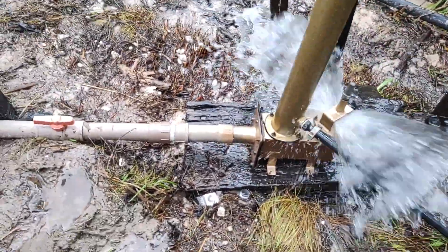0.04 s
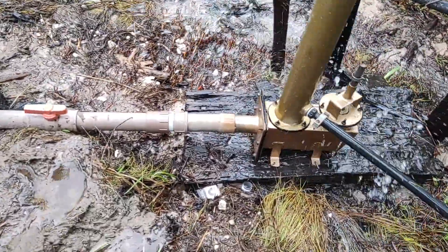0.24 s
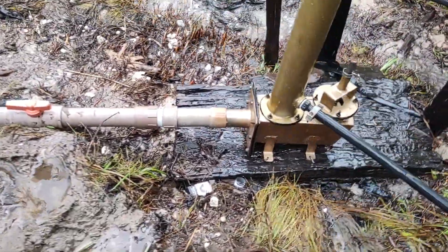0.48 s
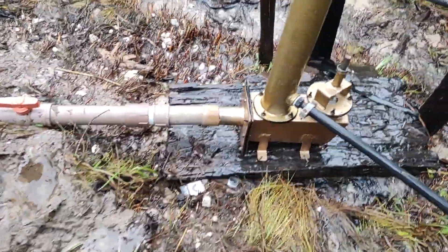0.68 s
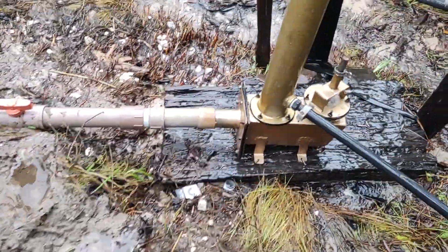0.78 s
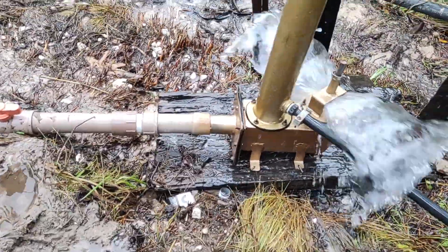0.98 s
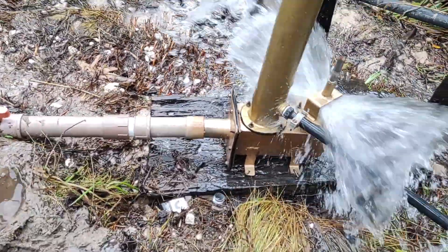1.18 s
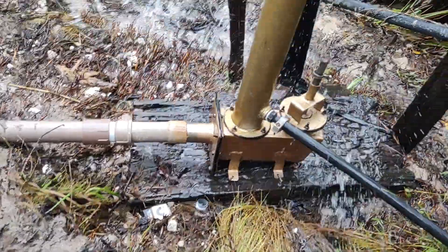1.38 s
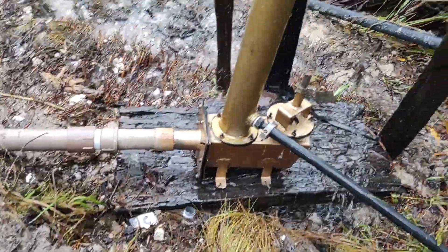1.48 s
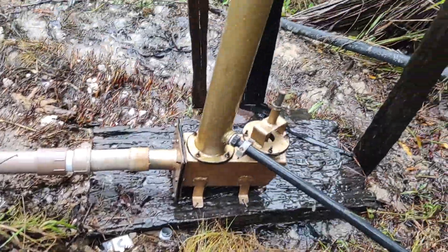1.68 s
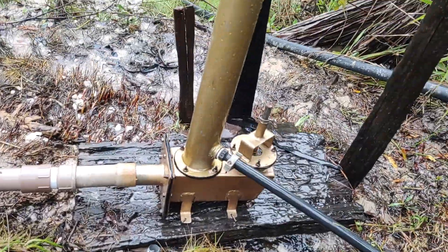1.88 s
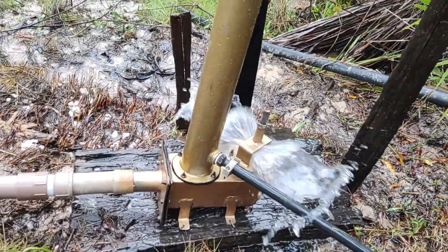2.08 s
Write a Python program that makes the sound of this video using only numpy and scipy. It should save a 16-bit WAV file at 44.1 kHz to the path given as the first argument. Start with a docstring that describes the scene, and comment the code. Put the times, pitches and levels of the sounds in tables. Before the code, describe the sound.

A water-driven pump beats twice, close up outdoors: the valve slams shut, thumps, drops open and hammers hard on its stop, then duller knocks follow in the pipe, amid spurting, pattering water on wet boards.

```python
"""Hydraulic ram pump, close by

Outdoors, close microphones: the pump beats about once a second. Its waste valve slams shut, the pressure wave
thumps back, the valve drops open and hammers two or three times on its stop, then knocks run along the drive pipe.
Each blow is a push, a coloured noise clatter and damped modes; the brass body rings on as fainter modes.
Sines make late rings after the blows; shaped noise and chirping grains make the spurting, splattering water."""
import sys
import numpy as np
from scipy import signal
from scipy.fft import rfft, irfft, next_fast_len
from scipy.io import wavfile
from scipy.ndimage import map_coordinates

SR = 44100
rng = np.random.default_rng(int(sys.argv[2]) if len(sys.argv) > 2 else 0)


def wav_out(sig):
    """Save sig, one row per channel (or a flat mono array), as 16-bit PCM at SR to the path in sys.argv[1]."""
    wavfile.write(sys.argv[1], SR, np.round(np.clip(np.atleast_2d(sig).T, -1, 1) * 32767).astype(np.int16))


N = 94815


def amp(db):
    """Decibels to amplitude."""
    return 10 ** (np.asarray(db) / 20)


def unit(x):
    """Scale to an RMS of one."""
    return x / np.sqrt(np.mean(x ** 2) + 1e-20)


def along(points, hz):
    """Interpolate (frequency [Hz], value) points on a log frequency axis."""
    f, v = np.transpose(points)
    return np.interp(np.log(hz + 1), np.log(f + 1), v)


def filtered(x, response):
    """Multiply the spectrum of x by a complex response of frequency."""
    size = next_fast_len(x.shape[-1] + 4096, True)
    spectrum = rfft(x, size) * response(np.fft.rfftfreq(size, 1 / SR))
    return irfft(spectrum, size)[..., :x.shape[-1]]


def coloured(x, points):
    """Pass x through a minimum-phase filter of unit energy with this spectrum."""
    size = 4096
    cepstrum = irfft(np.log(amp(along(points, np.fft.rfftfreq(size, 1 / SR)))))
    # folding the cepstrum forward makes the filter causal
    cepstrum[1:size // 2] *= 2
    cepstrum[size // 2 + 1:] = 0
    h = irfft(np.exp(rfft(cepstrum)))
    return signal.fftconvolve(x, h[None] / np.linalg.norm(h), axes=1)[:, :x.shape[1]]


# likeness of the two microphone channels: (frequency [Hz], correlation [-1 to 1])
CHANNEL_LIKENESS = [(100, 0.98), (300, 0.82), (600, 0.62), (1000, 0.48), (2000, 0.13), (4000, -0.12),
                    (12000, 0.03)]


def noise(size):
    """White stereo noise, alike in the bass and nearly unrelated in the treble."""
    def mid_side(hz):
        angle = np.arccos(np.clip(along(CHANNEL_LIKENESS, hz), -1, 1)) / 2
        return np.array([np.cos(angle), np.sin(angle)])

    mid, side = filtered(rng.standard_normal((2, size)), mid_side)
    return np.array([mid + side, mid - side])


def wobble(rate, size=N):
    """A smooth random curve with this many knots a second."""
    knots = rng.standard_normal(int(size * rate / SR) + 4)
    return map_coordinates(knots, [np.arange(size) * rate / SR])


def swell(t, rise, t60):
    """A rounded rise, then an exponential fall of 60 dB in t60 seconds."""
    attack = np.sin(np.pi / 2 * np.clip(t / max(rise, 1e-5), 0, 1)) ** 2
    return attack * np.exp(-np.log(1000) * np.maximum(t - rise, 0) / t60)


def ring(t, modes, rise, pitch=1):
    """Sum damped modes, each a little different in level from blow to blow."""
    total = 0
    for hz, db, t60 in modes:
        level = amp(db + rng.normal(0, 1))
        total = total + level * swell(t, rise, t60) * np.sin(2 * np.pi * hz * pitch * t)
    return total


def add(out, s, x):
    """Mix x in at time s."""
    i = max(round(s * SR), 0)
    out[:, i:i + x.shape[-1]] += x[..., :max(N - i, 0)]


TAIL_T60_S, TAIL_GRAIN_DB = 0.17, 4  # water rattling on after a blow
PUSH_SOFT_HZ = 1530  # the water cushions each push above this


def blows(rows, colour, modes, push_db, tail_db, ring_rise_s, right_lag_ms, right_db):
    """Each blow is one cushioned push, a clatter with a watery tail, and a ring of damped modes."""
    out, t = np.zeros((2, N)), np.arange(SR // 3) / SR
    for s, db, rise, t60, ring_db, lag, pitch in rows:
        tail = amp(tail_db + TAIL_GRAIN_DB * wobble(391, len(t))) * swell(t, rise, TAIL_T60_S)
        clatter = noise(len(t)) * (swell(t, rise, t60) + tail)
        push = np.zeros((2, len(t)))
        push[:, round(rise * SR / 2)] = -amp(push_db)
        push = filtered(push, lambda hz: 1 / (1 + 1j * hz / PUSH_SOFT_HZ) ** 2)
        direct = amp(db) * coloured(push, colour)
        direct = direct + amp(ring_db) * ring(t - lag, modes, ring_rise_s, pitch)
        # the right channel hears push and ring later (earlier where negative)
        delay_s = np.array([[0], [right_lag_ms / 1000]])
        direct = filtered(direct, lambda hz: np.exp(-2j * np.pi * hz * delay_s))
        add(out, s, direct + amp(db - 3) * coloured(clatter, colour))
    return out * amp([[-right_db / 2], [right_db / 2]])


# the waste valve shutting: (time [s], blow level [dB], rise [s], clatter t60 [s], ring level [dB],
# ring lag [s], ring pitch [ratio])
VALVE_SLAMS = [(.2388, -18, .004, .068, -14, .0005, 1), (1.3612, -16, .0065, .04, -18.5, .0015, 1.239)]
# its clatter: (frequency [Hz], relative level [dB])
SLAM_SPECTRUM = [(35, -55), (60, -24), (268, -1), (417, -6), (1200, -4), (1500, -11), (2250, -1.5),
                 (2840, -9), (3670, -4.5), (5860, -30), (16000, -26)]
# its ring: (frequency [Hz], level [dB], t60 [s])
SLAM_RING = [(255, -9.5, .05), (480, -11, .05), (832, 0, .048), (940, -3, .028), (1850, -11, .05)]


def slams():
    """The waste valve slams shut: a push, a clatter and short damped modes."""
    return blows(VALVE_SLAMS, SLAM_SPECTRUM, SLAM_RING, push_db=11, tail_db=-14,
                 ring_rise_s=0.0018, right_lag_ms=0.066, right_db=0.4)


# the pressure wave coming back: (time [s], blow level [dB], rise [s], clatter t60 [s], ring level [dB],
# ring lag [s], ring pitch [ratio])
RETURN_THUMPS = [(.391, -28.5, 0.005, .05, -20.5, 0.00055, 0.99),
                 (1.508, -35, .004, 0.065, -21.5, 0.0006, 0.94)]
# its clatter: (frequency [Hz], relative level [dB])
THUMP_SPECTRUM = [(40, -29), (100, -10), (450, 0), (700, -15), (4000, -10), (6000, -38)]
# its ring: (frequency [Hz], level [dB], t60 [s])
THUMP_RING = [(170, -8, .04), (318, 1.5, 0.025), (470, -4, 0.021)]


def thumps():
    """The pressure wave thumps back: a heavy push and low modes."""
    return blows(RETURN_THUMPS, THUMP_SPECTRUM, THUMP_RING, push_db=19, tail_db=-12,
                 ring_rise_s=0.0042, right_lag_ms=-0.042, right_db=1.0)


# the valve dropping open: (time [s], blow level [dB], rise [s], clatter t60 [s], ring level [dB],
# ring lag [s], ring pitch [ratio])
VALVE_RELEASES = [(.5092, -12.5, .0015, 0.028, -19, .004, 1),
                  (1.6258, -11.5, .001, 0.026, -20, 0.003, 0.99)]
# its clatter: (frequency [Hz], relative level [dB])
RELEASE_SPECTRUM = [(47, -43), (80, -23), (718, -1.5), (1250, -2.5), (2660, -9), (3470, -3.5),
                    (5280, -27.5), (7000, -34), (13000, -34), (16000, -23)]
# its ring: (frequency [Hz], level [dB], t60 [s])
RELEASE_RING = [(333, -1.5, .055), (598, -8, 0.15), (1164, 0.5, 0.1), (1336, -10, .08), (1975, -7.5, 0.06),
                (3260, -8, 0.044)]


def releases():
    """The valve drops open: a lighter push, a clatter and longer modes."""
    return blows(VALVE_RELEASES, RELEASE_SPECTRUM, RELEASE_RING, push_db=7, tail_db=-14,
                 ring_rise_s=0.0033, right_lag_ms=-0.065, right_db=-0.5)


# the valve hitting its stop: (time [s], blow level [dB], rise [s], clatter t60 [s], ring level [dB],
# ring lag [s], ring pitch [ratio])
STOP_BLOWS = [(.5563, -19, .001, .04, -6, 0.00175, 1.014),
              (1.6712, -17, 0.00203, .038, -12.5, 0.0011, 1.06),
              (.6006, -10.5, .002, .032, -9.5, 0.00553, .99),
              (1.6998, -19.5, 0.0011, .04, -24, 0.0011, 1.1), (1.7079, -11.5, .0015, .032, -8, .0005, 1.01)]
# its clatter: (frequency [Hz], relative level [dB])
STOP_SPECTRUM = [(40, -31.5), (200, -9), (450, -7), (700, 1), (1300, -5), (2000, -2.5), (2700, -16),
                 (4300, -13.5), (5600, -36.5), (15000, -48)]
# its ring: (frequency [Hz], level [dB], t60 [s])
STOP_RING = [(293, -19, 0.044), (670, -13.5, 0.025), (845.6, 0, .026), (933, -13.5, .025)]


def stops():
    """The valve hammers on its stop, which answers with very short modes."""
    return blows(STOP_BLOWS, STOP_SPECTRUM, STOP_RING, push_db=15.5, tail_db=-15,
                 ring_rise_s=.0025, right_lag_ms=0.084, right_db=0.7)


# knocks in the drive pipe: (time [s], blow level [dB], rise [s], clatter t60 [s], ring level [dB],
# ring lag [s], ring pitch [ratio])
PIPE_KNOCKS = [(.056, -51, .001, 0.045, -42.5, .001, 0.95),
               (.7768, -22.5, 0.00047, .046, -35, 0.00057, 0.96),
               (.938, -30, 0.00052, .04, -35, 0.00057, 0.95),
               (1.0875, -41, .001, 0.072, -36.5, 0.00094, 0.99), (1.229, -40, .001, 0.03, -37, 0.00089, 1),
               (1.8764, -19, .0012, .032, -29.5, 0.00052, 1.02),
               (2.0305, -36, .0005, 0.051, -36, 0.00053, 0.97),
               (2.0755, -38, 0.00043, 0.047, -40, .003, 1.04)]
# their clatter: (frequency [Hz], relative level [dB])
KNOCK_SPECTRUM = [(40, -34), (150, -15), (280, -5), (650, 0), (1150, .5), (1700, -8), (3000, -13),
                  (4400, -23), (5500, -46), (15000, -58)]
# their ring: (frequency [Hz], level [dB], t60 [s])
KNOCK_RING = [(240.6, 0, 0.051), (346, 1, 0.06), (633, 7.5, 0.028)]


def knocks():
    """Knocks run up and down the drive pipe: heavy pushes and short modes."""
    return blows(PIPE_KNOCKS, KNOCK_SPECTRUM, KNOCK_RING, push_db=19.5, tail_db=-11,
                 ring_rise_s=.0015, right_lag_ms=0.39, right_db=-1.0)


# the brass body's modes: (frequency [Hz], level [dB], t60 [s])
BRASS_MODES = [(514, -5, .6), (806, -1.5, .33), (1310, -11, .22)]
# what sets it ringing: (time [s], level [dB])
BRASS_STRIKES = [(.241, -35), (.392, -36.5), (1.51, -42), (1.709, -46.5)]
BODY_SAG, BODY_SAG_S = .05, .025  # its ring starts sharp by this share and settles with this time constant


def body():
    """The brass housing sings faintly after the blows, its modes sagging a little in pitch."""
    out, t = np.zeros((2, N)), np.arange(SR // 2) / SR
    sagging = t + BODY_SAG * BODY_SAG_S * (1 - np.exp(-t / BODY_SAG_S))
    for s, db in BRASS_STRIKES:
        add(out, s, amp(db) * ring(sagging, BRASS_MODES, 0.0065))
    return out


# single rings after the blows: (time [s], level [dB], frequency [Hz], t60 [s])
LATE_RINGS = [(.249, -31.5, 548, .2), (.255, -33.5, 2150, .15), (.564, -30, 1170, .1),
              (.568, -27, 781, .18), (.811, -38, 830, .18), (1.683, -27, 900, .15),
              (1.891, -31.5, 850, .11)]
LATE_RING_RISE_S, LATE_RING_ROUGH, LATE_RING_FLUTTER_PER_S = .007, .6, 260


def late_rings():
    """Rough single rings swell after the blows, sines unsteady in pitch and level."""
    out, t = np.zeros((2, N)), np.arange(SR // 5) / SR
    for s, db, hz, t60 in LATE_RINGS:
        drift = np.array([wobble(LATE_RING_FLUTTER_PER_S, len(t)) for ear in range(2)])
        phase = 2 * np.pi * hz * t + LATE_RING_ROUGH * drift
        flutter = np.exp(LATE_RING_ROUGH * wobble(LATE_RING_FLUTTER_PER_S, len(t)) / 2)
        add(out, s, amp(db) * flutter * swell(t, LATE_RING_RISE_S, t60) * np.sin(phase))
    return out


DROPS_DRAWN_PER_S, DROP_HZ, DROP_SPREAD, DROP_CYCLES, DROP_SCATTER_DB = 1500, 2600, .5, 9.5, 3.8
DROP_CLUMPING, CLUMPS_PER_S = .6, 120


def droplets():
    """A dense patter of tiny drops and bubbles, short chirps in clumps, scattered left and right."""
    count = int(DROPS_DRAWN_PER_S * N / SR)
    out, t = np.zeros((2, N)), np.arange(SR // 50) / SR
    landed = np.cumsum(np.exp(DROP_CLUMPING * wobble(CLUMPS_PER_S)))
    for when, size, pitch, side in rng.random((count, 4)):
        hz = DROP_HZ * np.exp(DROP_SPREAD * np.log(pitch / (1 - pitch)))
        if 950 < hz < 4800:  # other draws stay silent
            ear_delay_s = np.array([[side], [1 - side]]) * 0.00048
            cycles = np.maximum(t - ear_delay_s, 0) * hz
            grain = np.sin(2 * np.pi * cycles * (1 + 0.002 * cycles)) * np.exp(-3 * cycles / DROP_CYCLES)
            level = amp(-DROP_SCATTER_DB * np.log(size + 0.02))
            add(out, np.searchsorted(landed, when * landed[-1]) / SR, level * grain)
    return unit(out)


# the spurting water: (time [s], fine hiss level [dB], splashing level [dB])
SPURT_LEVELS = [(0, -58, -49), (.105, -59.5, -51), (.113, -48, -42), (.21, -49, -47.5), (.245, -48, -35),
                (.32, -44.5, -41.5), (.35, -50, -48), (.41, -45.5, -40), (.49, -47.5, -46), (.55, -51, -43),
                (.62, -63, -44), (.75, -59.5, -53.5), (.8, -59, -42), (.87, -74, -48), (.91, -74, -53),
                (.99, -58.5, -43.5), (1.14, -60.5, -51), (1.19, -53, -46.5), (1.35, -41.5, -44),
                (1.49, -43, -51), (1.6, -47.5, -41), (1.73, -52, -38.5), (1.78, -64, -54.5),
                (1.92, -63.5, -47.5), (1.98, -63.5, -55), (2.055, -62.5, -52.5), (2.1, -48.5, -42),
                (2.15, -65.5, -50.5)]
# spectra of the splashing and the hiss: (frequency [Hz], relative level [dB])
SPLASH_SPECTRUM = [(40, -47), (170, -8), (420, -7.5), (620, -2.5), (1000, -2), (1500, -9), (2600, -3.5),
                   (3500, 1), (4400, -1), (5500, -17), (8000, -35.5)]
HISS_SPECTRUM = [(2000, -20), (3400, 11.5), (4400, 11), (5800, 3.5), (15300, 5)]
WASH_DB, DROPS_DB = -.5, -1.5  # the two parts of the splashing


def spray():
    """The spurt fans out as flickering noise and splashes down as noise mixed with drops."""
    s, *levels = np.transpose(SPURT_LEVELS)
    hiss_db, splash_db = [np.interp(np.arange(N) / SR, s, level) for level in levels]
    hiss_flicker = amp(3.4 * np.array([wobble(260), wobble(260)]))
    hiss = unit(coloured(noise(N) * hiss_flicker, HISS_SPECTRUM))
    wash_flicker = amp(2.75 * np.array([wobble(200), wobble(200)]))
    wash = unit(coloured(noise(N), SPLASH_SPECTRUM) * wash_flicker)
    splash = amp(WASH_DB) * wash + amp(DROPS_DB) * droplets()
    return amp(hiss_db) * hiss + amp(splash_db) * splash


# single splats of water: (time [s], level [dB], centre frequency [Hz])
WATER_SPLATS = [(.0238, -29.5, 3320), (.438, -36, 1300), (0.5382, -26, 4300), (.641, -32, 1100),
                (0.6629, -26.5, 4000), (.802, -32.5, 2100), (0.813, -30, 2840), (.839, -34.5, 1600),
                (0.9488, -27, 3150), (.86, -38, 330), (1.1396, -32.5, 4640), (1.4344, -29, 3940),
                (1.5305, -25.5, 2980), (1.5535, -26, 1300), (1.5759, -21.5, 1550), (1.9155, -34, 3600),
                (2.0745, -29, 1050), (2.0837, -29.5, 2000), (2.101, -30, 1190), (2.114, -31, 2120),
                (2.123, -29, 770), (2.126, -35.5, 3230)]
SPLAT_RISE_S, SPLAT_T60_S, SPLAT_OCTAVES, SPLAT_TOP_HZ = .0008, 0.027, 0.38, 4810


def splats():
    """Lumps of water hit the boards and puddles, each a short noise burst around one pitch."""
    out, t = np.zeros((2, N)), np.arange(SR // 12) / SR
    for s, db, centre in WATER_SPLATS:
        def band(hz):
            octaves_off = np.log2((hz + 1) / centre)
            bell = 1 / (1 + (octaves_off / SPLAT_OCTAVES) ** 2 / 2) ** 2
            return bell / (1 + (hz / SPLAT_TOP_HZ) ** 20)

        burst = unit(filtered(noise(len(t)), band))
        add(out, s, amp(db) * burst * swell(t, SPLAT_RISE_S, SPLAT_T60_S))
    return out


# fine drops that tick close by: (time [s], level [dB])
DROP_TICKS = [(.321, -45), (.681, -49), (1.985, -53), (2.101, -41)]


def ticks():
    """Drops landing nearby click as brief bright noise."""
    out, t = np.zeros((2, N)), np.arange(SR // 12) / SR
    bright = [(1500, -24), (4500, 1), (9000, 4), (15000, -8)]  # (frequency [Hz], relative level [dB])
    for s, db in DROP_TICKS:
        add(out, s, amp(db) * coloured(noise(len(t)), bright) * swell(t, rise=0.0012, t60=0.034))
    return out


# the water column rumbling behind the shut valve: (time [s], level [dB])
COLUMN_RUMBLES = [(.243, -34), (.345, -43), (1.366, -44), (1.465, -47)]
# its spectrum: (frequency [Hz], relative level [dB])
RUMBLE_SPECTRUM = [(30, -40), (65, -20), (95, -1), (180, -4), (300, -14), (1200, -65)]


def rumbles():
    """The stopped water column shudders as swells of low noise."""
    out, t = np.zeros((2, N)), np.arange(SR // 3) / SR
    for s, db in COLUMN_RUMBLES:
        shudder = unit(coloured(noise(len(t)), RUMBLE_SPECTRUM))
        add(out, s, amp(db) * shudder * swell(t, rise=.015, t60=.16))
    return out


def scene():
    """The pump and its water, in the open air."""
    pump = slams() + thumps() + releases() + stops() + knocks() + body() + late_rings()
    water = spray() + splats() + ticks() + rumbles()
    return pump + water


LOW_CUT_HZ, TOP_HZ = 70, 16100


def record(dry):
    """The microphone sheds the deep bass and keeps nothing above its band limit."""
    return filtered(dry, lambda hz: (1j * hz / (LOW_CUT_HZ + 1j * hz)) ** 2 * (hz < TOP_HZ))


dry = scene()
out = record(dry)
wav_out(out)
```